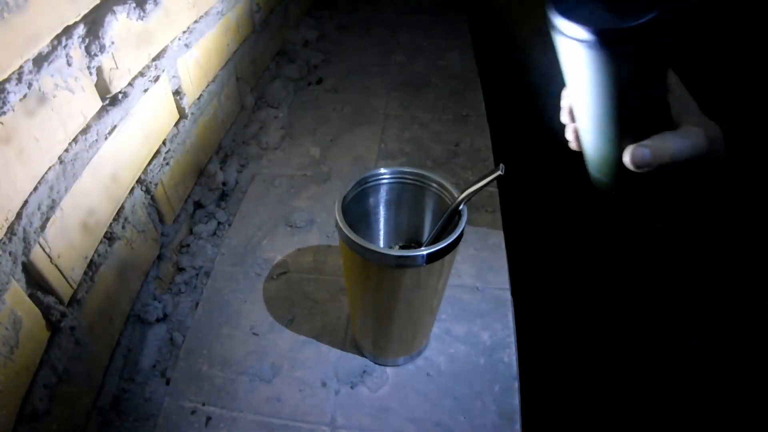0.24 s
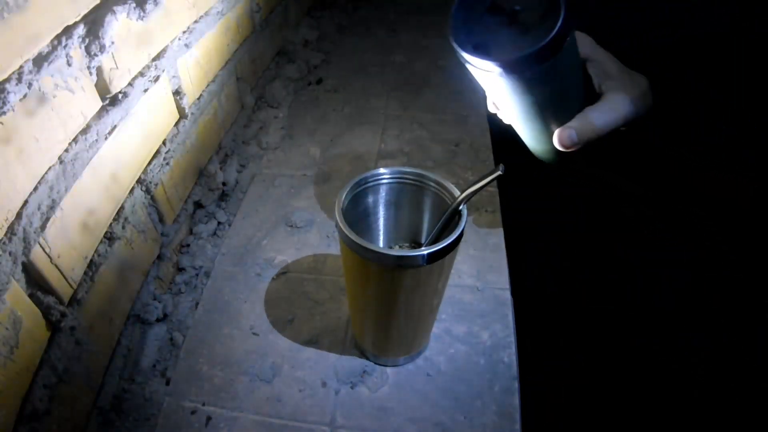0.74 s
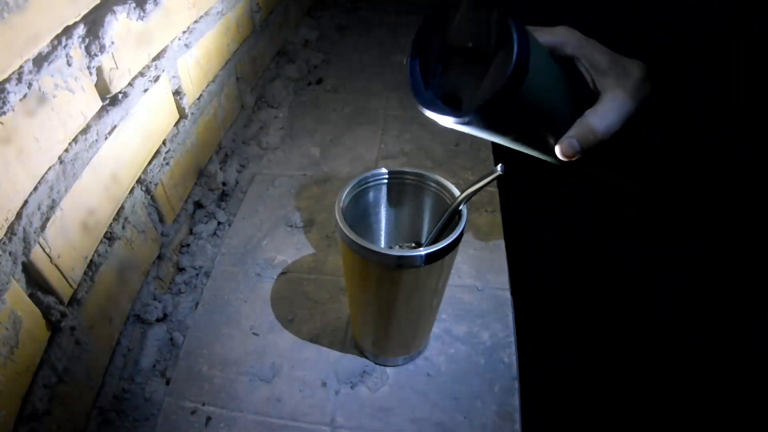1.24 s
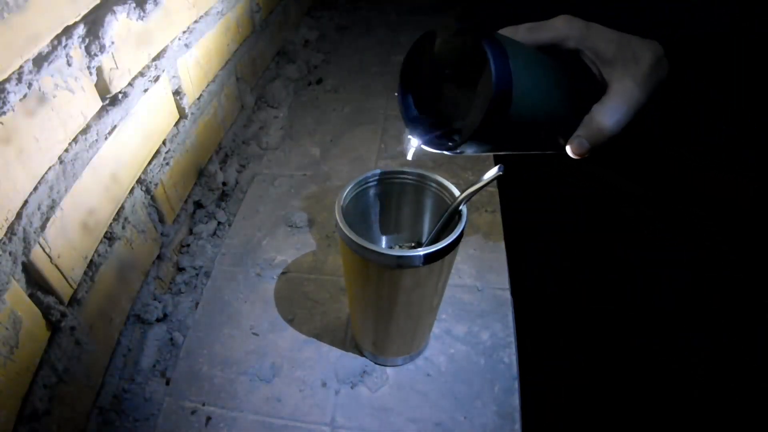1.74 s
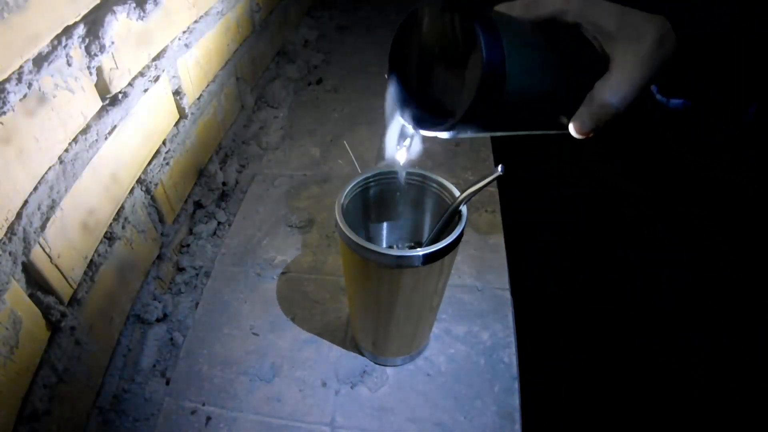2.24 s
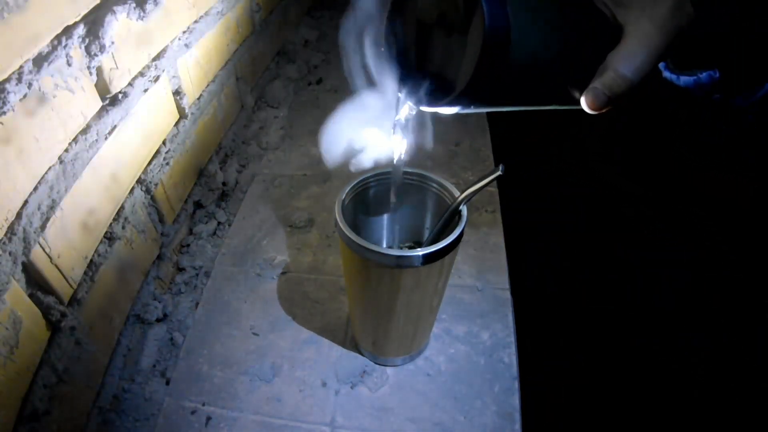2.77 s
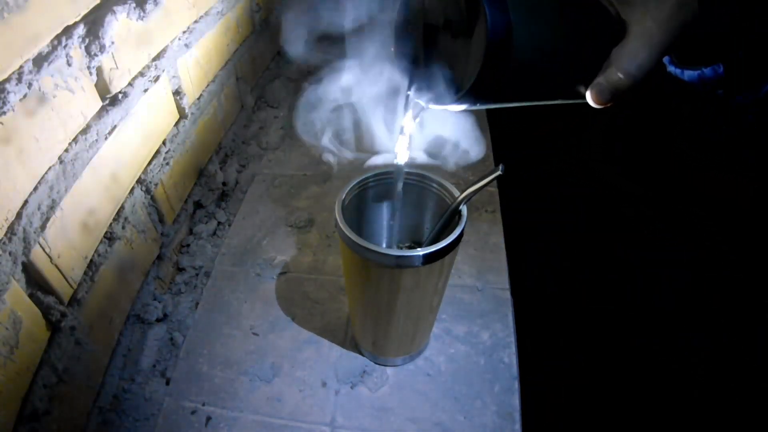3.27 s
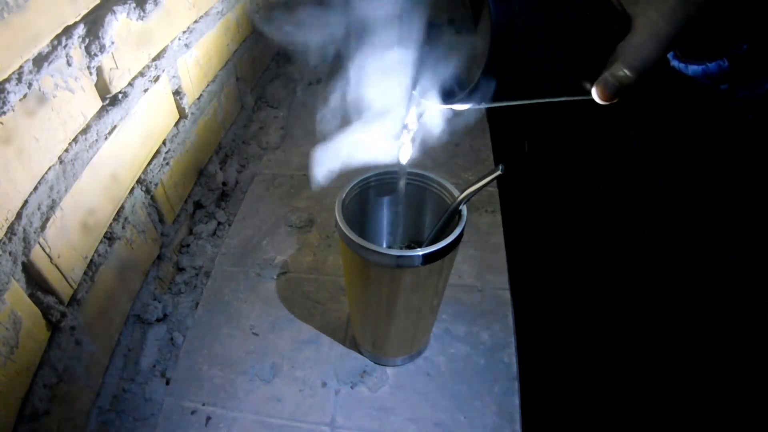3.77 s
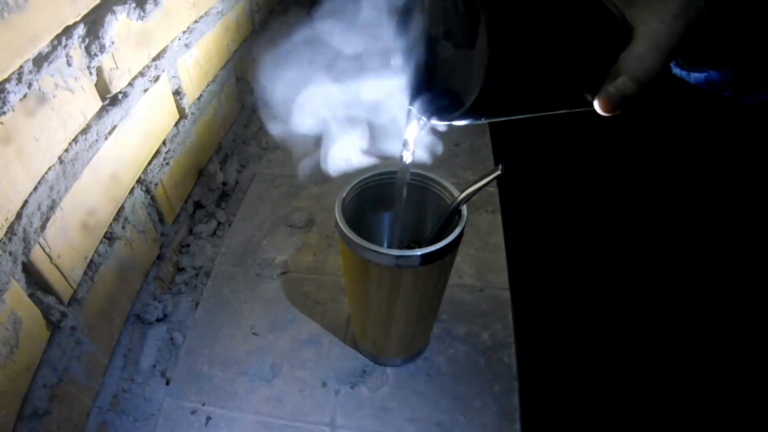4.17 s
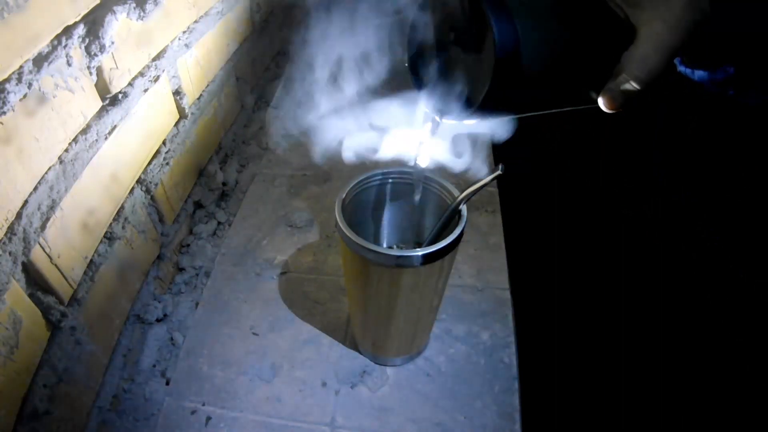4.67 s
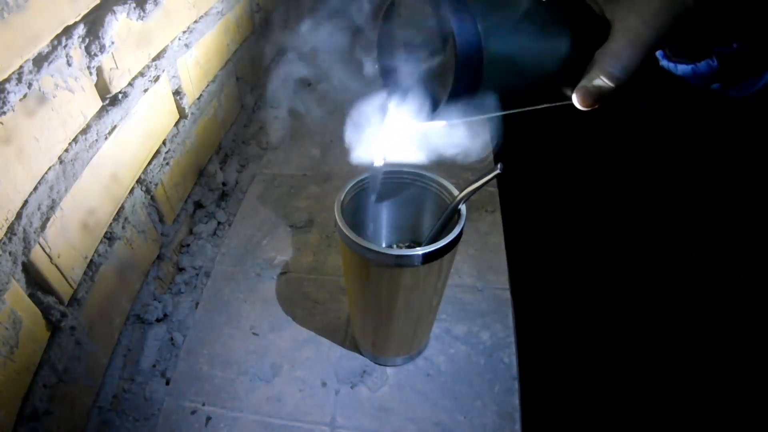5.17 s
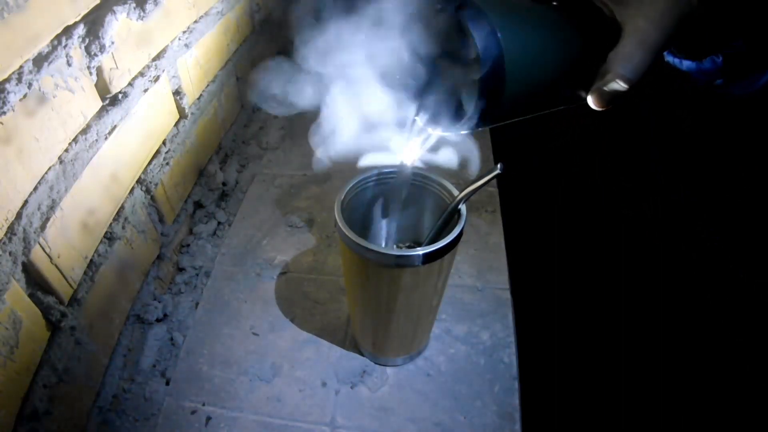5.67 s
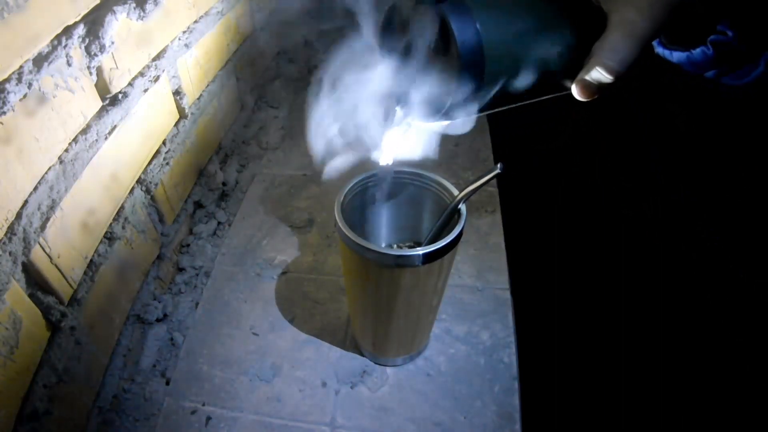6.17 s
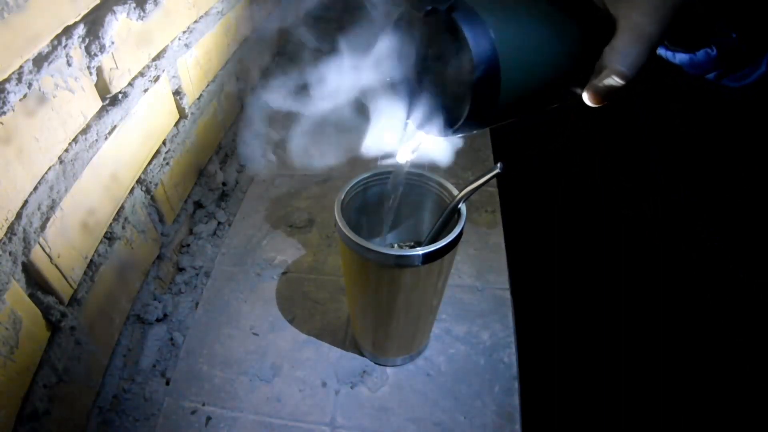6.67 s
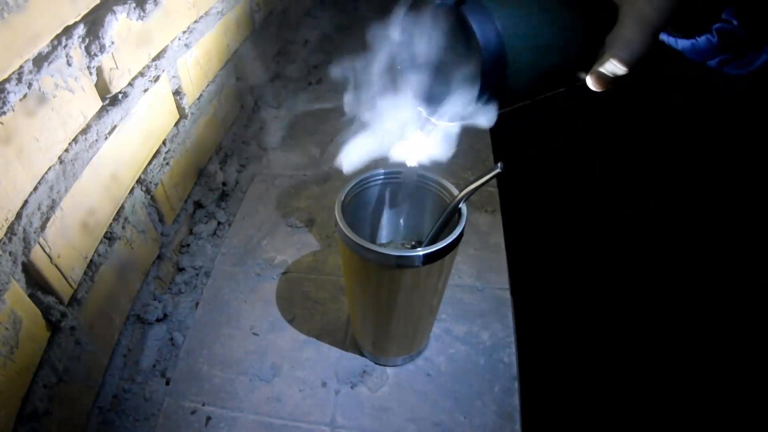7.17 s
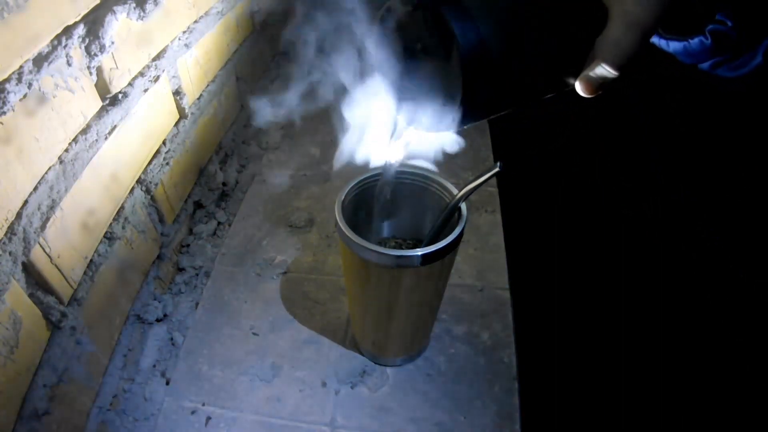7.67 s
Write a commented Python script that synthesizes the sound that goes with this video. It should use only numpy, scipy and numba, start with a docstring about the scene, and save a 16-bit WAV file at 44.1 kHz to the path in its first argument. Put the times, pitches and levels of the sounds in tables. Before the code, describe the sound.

Distant echoing knocks, then bubbly pouring into a resonant metal tumbler with a lull of drips midway, above a steady deep mechanical rumble.

```python
"""Far machinery rumbles, throbs and hums throughout: filtered noise, beating sines, broad air noise.
Early on a few distant knocks, noise bursts with low rings, die away in a large bare building.
Then hot water is poured from a flask into a tall metal cup: first drips and light spray, then a dense
run of plops, a lull of drips and a second run. Each slug swells a bubble and rings the air column and
wall of the cup; grains of spray ring its metal, small bubbles tick between, and the hall answers."""
import sys
import numpy as np
from scipy import signal
from scipy.fft import rfft, irfft
from scipy.io import wavfile
from scipy.ndimage import uniform_filter1d
from numba import njit

SR = 44100
rng = np.random.default_rng(int(sys.argv[2]) if len(sys.argv) > 2 else 0)


def wav_out(sig):
    """Save sig, one row per channel (or a flat mono array), as 16-bit PCM at SR to the path in sys.argv[1]."""
    wavfile.write(sys.argv[1], SR, np.round(np.clip(np.atleast_2d(sig).T, -1, 1) * 32767).astype(np.int16))


N = 349272
T = np.arange(N) / SR
BANDS_HZ = 25 * 2 ** np.arange(0, 9.6, .5)  # half-octave centres


def undb(db):
    """Turn dB into gain."""
    return 10 ** (np.asarray(db) / 20)


def level(x, db):
    """Scale a signal to an rms level in dB."""
    return x * undb(db) / np.sqrt(np.mean(x ** 2))


def on_log(hz, table):
    """Read (Hz, value) points on a log-frequency axis."""
    points_hz, values = np.array(table).T
    return np.interp(np.log(np.maximum(hz, 1)), np.log(points_hz), values)


def lift(hz, modes):
    """Gain of resonant humps over a flat response."""
    return undb(sum(db / (1 + (2 * (hz - f) / w) ** 2) for f, w, db in modes))


def walk(rate):
    """Random levels held 1 / rate s and slewed twice; spread near 1."""
    k = int(SR / rate)
    steps = np.repeat(rng.standard_normal(N // k + 1), k)
    return 1.3 * uniform_filter1d(uniform_filter1d(steps, k), k)[:N]


def noise_bands(gain_at):
    """One noise of the given spectrum, cut into overlapping half-octave bands that sum to the whole."""
    hz = np.fft.rfftfreq(N, 1 / SR)
    whole = rfft(rng.standard_normal(N)) * gain_at(hz)
    whole /= np.sqrt(2 * np.sum(np.abs(whole) ** 2)) / N  # rms of 1
    place = 2 * np.log2(np.maximum(hz, 1) / BANDS_HZ[0])
    return [irfft(whole * np.clip(1 - np.abs(place - k), 0, 1), N) for k in range(len(BANDS_HZ))]


@njit
def ring(x, hz, width):
    """A resonance whose centre and width move; an impulse of 1 rings with peak near 1."""
    y, z = np.empty(len(x)), 0j
    for i in range(len(x)):
        z = z * np.exp((2j * hz[i] - width[i]) * np.pi / SR) + x[i]
        y[i] = z.imag
    return y


def still(x, hz, width):
    """A resonance whose centre and width stay put."""
    return ring(x, np.full(N, 1. * hz), np.full(N, 1. * width))


def add(out, s, x):
    """Mix a short sound into a layer at s seconds."""
    i = max(int(s * SR), 0)
    out[i:i + len(x)] += x[:N - i]


# Far machinery as wavering bands. Each row: centre in Hz, width of each of two filters in Hz, level in dB rms.
RUMBLE_BANDS = [(34.8, 12, -39), (65.8, 4.3, -42), (149.8, 5.7, -47.5), (111.8, 9.3, -43), (125.6, 18, -51),
                (167.8, 14.7, -42), (227.3, 3.1, -51.5), (260.6, 3.6, -52.5), (279.5, 7.1, -50)]


def rumble():
    """Noise through two equal resonances in a row wavers as a narrow band."""
    out = 0
    for hz, width, db in RUMBLE_BANDS:
        once = still(rng.standard_normal(N), hz, width)
        out = out + level(still(once, hz, width), db)
    return out


# Machines at nearly the same speed beat. Each row: second at which they swell together, drift in dB
# per second, and the tones, each with pitch in Hz and level in dB rms at that second.
BEATING_MACHINES = [(3.279, -0.4, [(35.38, -34.5), (33.4, -51), (28.2, -53)]),
                    (3.62, -0.13, [(67.73, -38.5), (68.77, -42), (64.77, -41.5), (66.27, -46.5),
                    (74.44, -41)]), (5.47, 0.75, [(146.9, -33.5), (148, -47), (147.7, -46), (140.8, -56)])]


def throbs():
    """Close sines line up at one moment and beat slowly around it."""
    out = np.zeros(N)
    for s, drift_db, tones in BEATING_MACHINES:
        t = T - s
        start = 2 * np.pi * rng.random()
        for hz, db in tones:
            out += np.sqrt(2) * undb(db + drift_db * t) * np.sin(2 * np.pi * hz * t + start)
    return out


# Steadier machine tones. Each row: central pitch in Hz, central level in dB rms.
HUM_TONES = [(100.06, -31), (111.13, -42), (116.67, -44), (166.7, -50.5), (171.21, -49.5), (173.28, -46),
             (200.13, -54.5), (224.18, -55), (300.2, -46)]


def hum():
    """Sines that waver a little in level and phase."""
    out = np.zeros(N)
    for hz, db in HUM_TONES:
        gain = np.sqrt(2) * undb(db + 2.26 * walk(4.5))
        out += gain * np.sin(2 * np.pi * hz * T + 0.49 * walk(2.354) + 2 * np.pi * rng.random())
    return out


# Tilt of the broad air noise. Each row: frequency in Hz, relative density in dB.
AIR_SPECTRUM = [(15, -42), (25, -21), (70, -12), (150, -7.5), (200, -13.5), (306, -24), (340, -28.5),
                (550, -31.5), (1000, -33.5), (1600, -41.5), (2300, -52), (3400, -56.5), (4500, -60),
                (5600, -64), (9000, -65), (15600, -67.5)]
# Bands that stand out of it. Each row: centre in Hz, width in Hz, lift in dB.
AIR_HUMPS = [(411, 99, 7), (626, 30, 10), (3740, 240, 5), (4070, 130, 10.5), (5050, 230, 11.5),
             (8000, 200, 5), (7600, 200, 4.5), (10800, 200, 1.5), (11600, 200, 6.5), (11500, 200, 2),
             (15450, 250, -8)]
AIR_DB = -34.5  # central level of the whole, rms


def air():
    """Broad noise swells slowly as a whole while each band flickers on its own."""
    out = np.zeros(N)
    swell = walk(0.89)
    for band in noise_bands(lambda f: undb(on_log(f, AIR_SPECTRUM)) * lift(f, AIR_HUMPS)):
        out += band * undb(AIR_DB + .5 * swell + 1.17 * walk(9))
    return out


def machinery():
    """Narrow rumble, slow throbs, steadier hum and broad air noise together."""
    return rumble() + throbs() + hum() + air()


# Decay of the hall. Each row: frequency in Hz, time to fall 60 dB in seconds.
HALL_DECAY = [(200, 1.77), (500, 0.98), (1500, 1.17), (4000, 0.98), (12000, 0.92)]
HALL_DB = -8  # energy of the echo response


def hall(dry):
    """Bare walls answer with diffuse noise, each band dying at its own rate."""
    t = T[:SR]
    tail = 0
    for hz, band in zip(BANDS_HZ, noise_bands(np.ones_like)):
        tail = tail + band[:SR] * undb(-60 * t / on_log(hz, HALL_DECAY))
    tail *= 1 - np.exp(-t / 0.00037)
    return signal.fftconvolve(dry, tail * undb(HALL_DB) / np.sqrt(np.sum(tail ** 2)))[:N]


# Distant blows. Each row: start in seconds, relative level in dB, brightness in dB per octave about
# 1 kHz, rise time constant in seconds.
KNOCK_TIMES = [(.005, -29, 2, 0.00014), (0.163, -20.5, 1, 0.0036), (0.289, -35, -1, 0.0014),
               (1.067, -41.5, 3, 0.0085)]
# Colour of a blow. Each row: frequency in Hz, relative density in dB.
KNOCK_SPECTRUM = [(110, -40), (180, -29), (261, 0.5), (314, -8), (438, -11.5), (527, -12.5), (791, -16),
                  (1040, -18.5), (1630, -20), (2030, -30.5), (3960, -42), (6290, -53), (15000, -59)]
# Resonances in that colour. Each row: centre in Hz, width in Hz, lift in dB.
KNOCK_HUMPS = [(252, 35, 4), (165, 29, 19), (307, 21, -6.5), (364, 30, 4), (429, 47, 4), (786, 12, 13),
               (1180, 66, 7.5), (1640, 56, 7.5), (2170, 520, 6), (2960, 390, -4), (3770, 450, 6.5),
               (5100, 1800, 6)]
# Low rings of the struck object itself. Each row: pitch in Hz, width in Hz, level against the knock in dB.
STRUCK_RINGS = [(245.4, 6, 1.5), (281, 10, -18)]
THUD_GAIN, THUD_S, THUD_TOP_HZ = 0.76, 0.018, 484  # the low body starts stronger and sinks fast
CRACK_GAIN, CRACK_S, CRACK_FROM_HZ = 0.47, 0.043, 4000  # the treble starts brighter too


def knock_echoes():
    """Far blows arrive almost wholly as echo: a quick rise, then the decay of the hall."""
    out = np.zeros(N)

    def colour(f):
        return undb(on_log(f, KNOCK_SPECTRUM)) * lift(f, KNOCK_HUMPS) * (f > 150)

    for hz, band in zip(BANDS_HZ, noise_bands(colour)):
        rough = undb(2.7 * walk(30.2))  # single echoes stand out of the tail
        for s, db, tilt_db, rise in KNOCK_TIMES:
            t = np.maximum(T - s, 0)
            thud = THUD_GAIN * np.exp(-t / THUD_S) / (1 + (hz / THUD_TOP_HZ) ** 4)
            bright = CRACK_GAIN * np.exp(-t / CRACK_S) / (1 + (CRACK_FROM_HZ / hz) ** 4)
            first = 1 + 0.37 * np.exp(-t / 0.0055) + thud + bright
            decay = undb(db + tilt_db * np.log2(hz / 1000) - 60 * t / on_log(hz, HALL_DECAY))
            out += band * decay * first * rough * (1 - np.exp(-t / rise))
    return out


def knock_rings():
    """The struck object sounds its low modes as decaying sines."""
    out = np.zeros(N)
    for s, db, tilt_db, rise in KNOCK_TIMES:
        t = np.maximum(T - s, 0)
        for hz, width, ring_db in STRUCK_RINGS:
            gain = undb(db + ring_db + tilt_db * np.log2(hz / 1000))
            shape = np.exp(-np.pi * width * t) * (1 - np.exp(-t / rise))
            out += gain * shape * np.sin(2 * np.pi * hz * t)
    return out


def knocks():
    """Each blow is diffuse echo with its low rings coming through."""
    return knock_echoes() + knock_rings()


# Spurts of spray. Each row: peak in seconds, relative level in dB, finest drops against that level in dB.
SPRAY_SPURTS = [(1.97, -62, -18), (2.13, -64, -13), (2.29, -56.5, -5), (2.48, -58, -7), (2.55, -59, -9),
                (3.17, -59, -12), (3.29, -67, -9), (3.42, -54, -17), (3.53, -52, -16), (3.6, -66, -16),
                (4.41, -55.5, -4), (4.8, -57, -14), (5.44, -66, -11), (5.59, -58, -13), (5.99, -63, -6),
                (6.88, -59, -8), (6.96, -64, -6), (7.53, -57, 5), (7.68, -56, -8), (7.73, -54, -19),
                (7.92, -55, -11)]
SPURT_RISE_S, SPURT_FALL_S = 0.026, 0.0088  # time constants


def spurting(db, spurt_db):
    """A level in dB with the power of the spurts added: each swells and dies quickly."""
    for (s, *_), top_db in zip(SPRAY_SPURTS, spurt_db):
        shape = np.exp(-np.abs(T - s) / np.where(T < s, SPURT_RISE_S, SPURT_FALL_S))
        db = 20 * np.log10(np.hypot(undb(db), undb(top_db) * shape))
    return db


# The stream. Each row: time in seconds, relative patter level in dB, relative spray level in dB, finest
# drops against the spray in dB.
STREAM = [(1.9, -62, -75, -8), (2.05, -56, -70, -1), (2.32, -55, -76, 2), (2.6, -46, -73, 2),
          (2.74, -47, -64, 1), (2.87, -48, -63, -4), (3.1, -47, -65, -5), (3.26, -44, -80, -1),
          (3.63, -49, -73.5, 1), (3.83, -48, -64.5, -3), (4.1, -42, -69, -2), (4.45, -49.5, -66.5, -7),
          (4.8, -57, -68, -6), (5.29, -54, -68, -5), (6.04, -51.5, -69.5, 0), (6.49, -45.5, -61, -16),
          (6.61, -42.5, -62.5, -10), (7.05, -44, -67, -6), (7.18, -44, -63, -8), (7.48, -52, -66, -11),
          (7.92, -52, -60, -19)]
GUSTS_PER_S, GUST_DB = 20, 4  # the spray comes and goes by chance


def stream_levels():
    """Follow the stream: patter and gusty, spurting spray in dB, and the finest drops against the spray."""
    s, *columns = np.transpose(STREAM)
    patter_db, spray_db, finest_db = (np.interp(T, s, c) for c in columns)
    spray_db += GUST_DB * walk(GUSTS_PER_S)
    _, top_db, share_db = np.transpose(SPRAY_SPURTS)
    finest_db = spurting(spray_db + finest_db, top_db + share_db)
    spray_db = spurting(spray_db, top_db)
    return patter_db, spray_db, finest_db - spray_db


def scatter(count, level_db, spread_db, most_db):
    """Chance moments along the pour, sizes following its level; returns times, gains and a spare draw."""
    when, size, spare = rng.random((count, 3)).T
    s = STREAM[0][0] + (STREAM[-1][0] - STREAM[0][0]) * when
    size_db = np.minimum(-spread_db * np.log(size), most_db)
    return s, undb(np.interp(s, T, level_db) + size_db), spare


def bubble(hz, cycles, glide, count=900):
    """A trapped bubble swells over about a cycle, rings briefly and, with glide, rises in pitch."""
    c = np.arange(count) / SR * hz
    return (1 - np.exp(-(c / 1.45) ** 2)) * np.exp(-c / cycles) * np.sin(2 * np.pi * c * (1 + glide * c))


def slug(hz, count):
    """The push of a slug of water: a smooth swing, so that little spreads beyond the ring it drives."""
    return np.hanning(count) * np.sin(2 * np.pi * hz * T[:count]) * 4 / count


def grit_fade():
    """Envelope of a splash: a very quick rise and a short fall."""
    t = T[:160]
    return np.exp(-t / 0.0019) * (1 - np.exp(-t / 0.00046))


# Small bubbles. Each row: start in seconds, relative level in dB, central pitch in Hz.
SMALL_BUBBLES = [(1.9532, -49, 4150), (2.1378, -51, 5700), (2.2795, -52, 4000), (2.753, -50, 8960.0),
                 (2.8033, -51, 9900), (2.8175, -57, 5400), (2.8924, -51, 5410.0), (2.903, -47, 9940.0),
                 (3.0347, -42.5, 9400), (3.052, -50, 5340), (3.0648, -44, 9000), (3.1654, -46, 4100),
                 (3.4434, -51, 3950), (3.515, -46, 3900), (3.5931, -50, 4070), (3.7599, -49, 5370),
                 (3.7954, -39, 9300), (3.8161, -52, 9900), (3.8315, -40, 9250), (3.9095, -46, 10030.0),
                 (4.1347, -47, 5360), (4.4052, -50, 5460.0), (4.811, -49, 4000), (5.984, -49, 4000),
                 (6.0141, -55, 4060), (6.267, -50, 4300), (6.3845, -48, 5440), (6.7287, -53, 5400),
                 (6.869, -46, 5600), (6.9626, -43, 5700), (7.069, -48.0, 5770), (7.4536, -52, 5170),
                 (7.4793, -50, 4300), (7.742, -47, 3250), (7.827, -47, 3980)]
TICK_SPREAD, TICK_GAP_S = 0.03, 0.0061  # a small bubble bursts into three, apart in pitch and time


def ticks(bubbles, crack):
    """A small bubble clicks and bursts into three long-ringing ones, each weaker than the last."""
    for (s, db, hz), detune in zip(SMALL_BUBBLES, rng.standard_normal((len(SMALL_BUBBLES), 3))):
        for k, d in enumerate(detune):
            tone = bubble(hz * (1 + TICK_SPREAD * d), cycles=11.7, glide=0.00044, count=500)
            add(bubbles, s + k * TICK_GAP_S, undb(db - 4.4 * k) * tone)
        add(crack, s, undb(db - 17) * np.ones(1))


# Thin drips while the stream is weak. Each row: start in seconds, relative level in dB, centre in Hz.
THIN_DRIPS = [(2.08, -37.5, 1950), (2.2164, -37, 1830), (2.237, -36.5, 1940), (2.471, -41.5, 2730),
              (4.79, -66, 4050), (4.847, -42, 1920), (5.035, -39, 2190), (5.1628, -46, 2190),
              (5.3643, -40.5, 1880), (5.539, -51, 1800), (5.8688, -40, 2130), (6.0284, -46, 1820),
              (6.1397, -46, 1970), (6.289, -40, 1860), (6.4084, -43, 2450)]
# Push on the air column at 2 kHz; the slope adds with rising centre frequency.
DRIP_PUSH_DB, DRIP_PUSH_DB_PER_OCTAVE = 7.5, 1


def drips(bubbles, push, crack):
    """A drip is a gritty burst smeared by a very short bubble, with a push on the air column."""
    fading, on_air = grit_fade(), slug(1156, count=66)
    for (s, db, hz), grit in zip(THIN_DRIPS, rng.standard_normal((len(THIN_DRIPS), 160))):
        burst = grit * fading
        tone = np.convolve(burst, bubble(hz, cycles=0.61, glide=0, count=40)) / 3
        add(bubbles, s, undb(db + 17.0) * tone)
        add(push, s, undb(db + DRIP_PUSH_DB + DRIP_PUSH_DB_PER_OCTAVE * np.log2(hz / 2000)) * on_air)
        add(crack, s, undb(db - 32.5) * burst)


def patter(bubbles, push, crack, patter_db):
    """Dense small slugs at chance moments: each a bubble, a push on the air column and a faint click."""
    on_air = slug(950, count=66)
    grains = scatter(count=900, level_db=patter_db + 1.5, spread_db=6.0, most_db=13.5)
    for s, gain, pitch in zip(*grains):
        tone = bubble(780 * 3.2 ** (pitch ** 1.5), cycles=1.75, glide=0.0095, count=500)
        add(push, s, gain * undb(-3.0) * on_air)
        add(bubbles, s, gain * undb(-1.0) * tone)
        add(crack, s, gain * undb(-30.5) * np.ones(1))


# Treble rings of the cup and its metal straw. Each row: pitch in Hz, width in Hz, relative level in dB.
METAL_RINGS = [(2390, 270, 5.5), (2700, 310, 8.5), (3854, 200, 2), (4440, 200, 0), (5360, 380, 7),
               (6440, 330, -1), (7470, 260, -7), (9170, 340, -3.5), (10030, 89, -10.5), (11330, 370, -5.5),
               (13800, 500, -21), (15700, 300, -26)]
# Relative levels in dB of the air-column multiples 3, 5, .. 15.
OVERTONE_LEVELS = [-8.5, -4.5, -8.5, -7.5, -11, -11, -14]
OVERTONE_HZ, OVERTONE_WIDTH_HZ = 972, 105  # base of the odd multiples; width of the third
OVERTONE_WIDENING = 0.083  # share of that width gained from one multiple to the next
COARSE_TOP_HZ = 3600  # coarse splash drives the rings below this, fine splash those above
PATCHY_DB, PATCHES_PER_S = 2.5, 11  # each ring gets its spray in patches


def treble_rings(crack, coarse, fine, spray_db, finest_db):
    """Spray and splashes ring the metal and the odd multiples of a tube closed at one end."""
    s, gain, _ = scatter(count=2500, level_db=spray_db - 10.5, spread_db=2.5, most_db=13)
    moments = (s * SR).astype(int)
    overtones = []
    for k, db in enumerate(OVERTONE_LEVELS):
        width = OVERTONE_WIDTH_HZ * (1 + OVERTONE_WIDENING * k)
        overtones.append(((3 + 2 * k) * OVERTONE_HZ, width, db))
    treble = np.zeros(N)
    for modes, crack_db, drops_db in ((METAL_RINGS, -6, 0), (overtones, 2, -10)):
        for hz, width, db in modes:
            # each drop lands elsewhere and so strikes the rings in its own proportions
            spray = np.bincount(moments, gain * rng.standard_normal(len(s)), N + 1)[:N]
            finest = (finest_db + 11.5) * (hz > 8000)  # the highest rings follow the finest drops
            spray *= undb(finest + PATCHY_DB * walk(PATCHES_PER_S))
            splash = crack + (coarse if hz < COARSE_TOP_HZ else fine)
            treble += undb(db) * still(undb(drops_db) * spray + undb(crack_db) * splash, hz, width)
    return treble


# Air column of the cup. Each row: time in seconds, width of the lowest mode in Hz, central pitch of the
# bubbles trapped by plops in Hz.
AIR_COLUMN = [(1.9, 192, 1420), (4.6, 179, 1380), (6.2, 143, 1407), (7.92, 102, 1333)]
# Plops. Each row: splash in seconds, then relative levels in dB of the push on the air column, trapped
# bubble, wall ring, coarse splash and fine splash, then central pitch of the air column in Hz.
PLOP_EVENTS = [(2.2666, -23, -15.5, -48, -73, -68, 1080), (2.2799, -19.5, -13, -35, -74, -71, 1080),
               (2.5353, -23.5, -21.0, -35, -61.0, -68, 1055), (2.633, -28.0, -24, -47, -60, -75.0, 1040),
               (2.7215, -17.5, -15, -38, -67, -60, 1030), (2.7543, -21, -19, -36, -74, -78, 1050),
               (2.786, -20.5, -17, -42.0, -74, -68, 1040), (2.8035, -34, -21, -59, -70, -68, 1050),
               (2.8163, -25, -19.5, -43.0, -68.0, -71, 1045), (2.83, -22, -40, -46, -60, -73, 990),
               (2.859, -23, -17, -56.0, -66.0, -77, 1040), (2.8787, -18, -28.5, -46, -67, -72, 1030),
               (2.8919, -14.5, -12, -35.5, -54.5, -63, 1045), (2.9023, -24, -21.5, -56.0, -66.0, -69, 1035),
               (2.9323, -12, -11.5, -35, -67.5, -62, 1040), (2.953, -30.5, -30, -40, -76.0, -73.0, 1050),
               (2.978, -16.5, -17, -56.5, -67, -68, 1020), (3.002, -34, -23, -45, -66, -73.5, 1050),
               (3.042, -27.5, -33, -54.0, -69.0, -65, 1025), (3.0526, -21, -16, -47, -68, -65, 1040),
               (3.0819, -18, -14, -38, -68.5, -67, 1060), (3.1185, -16, -15.5, -36, -67.0, -66.5, 1050),
               (3.144, -34, -26, -48, -72, -79, 1035), (3.1593, -24.5, -21, -42, -66, -66, 1055),
               (3.1848, -19, -22.5, -35, -78.5, -72, 1060), (3.2396, -33, -41, -48.5, -72, -81, 1050),
               (3.2594, -25.5, -23.5, -47.0, -75, -69, 1020), (3.272, -35, -21.5, -50, -81.0, -71.5, 1030),
               (3.2889, -14, -15.5, -30, -67.5, -65.5, 1010), (3.308, -33.5, -24, -56.5, -72, -78.0, 1050),
               (3.3292, -33, -29, -41, -85.5, -74, 1040), (3.3623, -28, -26.5, -45, -73.0, -78.0, 1070),
               (3.368, -27, -22.5, -45, -77.5, -80.0, 1090),
               (3.4407, -17.0, -15, -41.5, -59.5, -67.0, 1050),
               (3.472, -20.0, -20.5, -41.5, -69, -67, 1030), (3.523, -19, -17.5, -52.0, -57.5, -65, 980),
               (3.5418, -26, -28.5, -54.5, -71, -77.5, 1035), (3.5579, -13, -30, -33, -65.5, -64, 1035),
               (3.572, -11, -18, -24, -59, -59, 1030), (3.608, -14.5, -17, -39, -74.0, -66, 1010),
               (3.6515, -28, -38, -53, -65, -74.5, 995), (3.6733, -25, -21.5, -33, -67, -71, 1015),
               (3.6857, -15, -27, -38.5, -64, -66, 1040), (3.7353, -25.5, -34, -55.0, -75, -66, 1045),
               (3.7986, -31, -36.5, -38, -71.5, -68.5, 1000), (3.8147, -20, -16, -41, -69.5, -69, 1050),
               (3.8382, -18.5, -22.5, -56.5, -57, -62, 1010), (3.969, -20, -19, -41.5, -71, -68, 1030),
               (4.004, -18, -15, -44.0, -66, -67, 1040), (4.0625, -27, -24, -37, -76.0, -67, 970),
               (4.0828, -25.5, -25.5, -38, -74.0, -77.0, 1020), (4.1025, -29, -24, -49.5, -83.5, -79, 990),
               (4.111, -31, -23, -56.0, -75.5, -77.5, 1055), (4.1338, -20.5, -22, -40, -70.5, -69, 990),
               (4.1527, -22, -25, -41, -65, -71, 1105), (4.164, -19.5, -19.5, -34, -59, -66, 1010),
               (4.184, -26, -28.0, -51, -67, -75.5, 1030), (4.196, -28, -28, -56.0, -72.0, -76.0, 1015),
               (4.2945, -25.5, -20, -56, -69, -78, 1015), (4.384, -30, -22, -57.5, -69, -72.5, 1005),
               (4.417, -22.0, -17.5, -42.5, -68.0, -68.0, 1070), (4.443, -18, -18, -46.5, -66, -69, 1045),
               (4.4662, -14.5, -15, -42, -56.5, -63, 1080), (4.4877, -23.5, -19.5, -48, -68.0, -75, 1050),
               (4.5, -16.5, -15.5, -35, -71, -68.0, 1015), (4.522, -17.5, -19, -39.0, -75, -68.0, 1050),
               (4.552, -25, -22.5, -50.0, -82.5, -79, 1030), (4.9117, -36, -37, -58.0, -84, -72, 1005),
               (5.294, -34, -32, -60.5, -76.5, -84, 1000), (5.467, -31, -37.5, -52.5, -77.5, -84.5, 990),
               (5.853, -38, -37, -46.5, -73.5, -86.0, 965), (5.984, -31, -41, -56.5, -78, -74, 970),
               (6.0147, -30.5, -27.5, -54, -74, -68, 960), (6.16, -23, -19, -43, -63, -74, 970),
               (6.192, -27.5, -27, -54.0, -72.0, -75, 940), (6.201, -33, -35.5, -49.5, -68.0, -78, 950),
               (6.2432, -30.5, -30, -43, -65, -79, 950), (6.2677, -27.0, -29, -59.5, -61.5, -76, 940),
               (6.429, -28.0, -28.0, -50.0, -72.5, -69, 960),
               (6.4523, -23, -36.0, -46.5, -76.0, -73.0, 940),
               (6.5026, -28.5, -40.5, -58.5, -79, -72.5, 945), (6.516, -26, -33, -49.5, -59, -77.0, 985),
               (6.5454, -17.5, -21.5, -53, -73.5, -66, 1060), (6.565, -26.0, -21.5, -44, -73.5, -73.5, 970),
               (6.625, -25, -39.5, -59.0, -67, -78, 940), (6.6391, -15, -22, -50, -63, -66, 980),
               (6.6916, -17.5, -19, -51, -66.5, -67.0, 970), (6.727, -24, -20.5, -58.5, -72, -63, 1040),
               (6.74, -17, -20, -55, -64, -67.0, 940), (6.7662, -22.0, -27, -59.5, -70.5, -74, 990),
               (6.7775, -21.5, -30, -59.0, -72.5, -78, 1000), (6.7988, -27.5, -32, -60.0, -77.0, -79, 940),
               (6.872, -22.5, -29, -48, -84.0, -63, 990), (6.8883, -23.5, -27, -59.0, -69.5, -75.0, 975),
               (6.9627, -22, -26, -44.0, -78.5, -61, 960), (6.995, -32.5, -34, -58.0, -84.5, -80.0, 975),
               (7.0143, -12.5, -28, -43, -60, -61, 980), (7.052, -18, -31.0, -46, -72, -63, 940),
               (7.0742, -14, -22, -48, -67.5, -60.5, 965), (7.085, -24, -35.5, -49.0, -75.0, -71, 995),
               (7.1112, -25, -33.5, -44.0, -68, -76.5, 985), (7.1166, -18, -33.5, -45.0, -59, -66, 940),
               (7.1447, -18, -19.5, -42.5, -59, -70.0, 980), (7.153, -15, -20.5, -33, -66, -63, 1010),
               (7.157, -16.5, -15.0, -47, -64, -68, 960), (7.186, -30, -28, -45.5, -79.5, -78.0, 1005),
               (7.1997, -18.5, -29.5, -41.0, -66, -67.0, 980), (7.2125, -16, -31, -37, -66, -68.5, 955),
               (7.2674, -13, -19, -41, -68, -61, 960), (7.278, -23, -34, -55.5, -71, -71.5, 950),
               (7.2996, -16.5, -20, -48.5, -61, -62, 1020), (7.3373, -22.5, -39.0, -49, -84, -74.0, 930),
               (7.357, -34, -27, -56.5, -65, -75.5, 1005), (7.4518, -25, -34, -56.0, -61, -68.0, 975),
               (7.4773, -19.5, -27, -43.5, -69, -63, 970), (7.5065, -10, -18, -34.0, -57, -58.5, 1005),
               (7.523, -19.5, -31.5, -43, -64, -60, 980), (7.5327, -16.0, -29.0, -36, -65, -64, 970),
               (7.601, -33, -27.5, -41, -74.5, -83.5, 975), (7.627, -28.5, -40.5, -54.0, -82, -82.0, 990),
               (7.6459, -27.5, -37.5, -48.0, -84.0, -81.0, 1000), (7.68, -17, -23, -44, -71, -67.0, 1060),
               (7.6894, -10.5, -11, -43, -55, -58.5, 1010), (7.7152, -30, -38.5, -57.5, -73.0, -72.0, 995),
               (7.74, -22, -40.5, -57, -67.5, -70.0, 980), (7.7568, -23, -28, -45, -74.5, -74.0, 980),
               (7.7747, -25.5, -29, -59.0, -79.0, -78, 1010), (7.7992, -24.5, -30.5, -44, -81, -71, 1030),
               (7.817, -26, -32.5, -58.5, -71.0, -70, 1005), (7.8363, -20.0, -25, -46, -75.0, -69, 1020),
               (7.8742, -22, -28.5, -59.0, -75.0, -70, 970), (7.8988, -21, -30, -59.5, -69, -64, 1005)]
COLUMN_WOBBLE = 0.019  # the surface never rests, so the air column wanders in pitch
WALL_HZ, WALL_WIDTH_HZ = 613, 44


def plops(bubbles, push, coarse, fine, wall):
    """Each slug traps a bubble, pushes the air column, strikes the wall and splashes."""
    s, _, bubble_hz = np.transpose(AIR_COLUMN)
    on_air, on_wall, fading = slug(1156, count=66), slug(WALL_HZ, count=110), grit_fade()
    draws = rng.standard_normal((len(PLOP_EVENTS), 161))
    for (at, db, bubble_db, wall_db, coarse_db, fine_db, _), draw in zip(PLOP_EVENTS, draws):
        hz = np.interp(at, s, bubble_hz) * (1 + .04 * draw[0])
        burst = draw[1:] * fading
        add(push, at - .0006, undb(db) * on_air)  # the air is pushed just before the splash breaks
        add(bubbles, at - .0006, undb(bubble_db) * bubble(hz, cycles=1.78, glide=0.0029))
        add(coarse, at, undb(coarse_db) * burst)
        add(fine, at, undb(fine_db) * burst)
        add(wall, at, undb(wall_db) * on_wall)


def air_column(push):
    """The lowest mode of the air in the cup; the heaving water retunes it at each plop."""
    s, widths, _ = np.transpose(AIR_COLUMN)
    plop_s, *_, pitch_hz = np.transpose(PLOP_EVENTS)
    latest = np.maximum(np.searchsorted(plop_s - .002, T) - 1, 0)
    hz = pitch_hz[latest] * (1 + COLUMN_WOBBLE * walk(45))
    return ring(push, hz, np.interp(T, s, widths))


def pour():
    """Plops, patter, drips, ticks and spray, sounding through the air, wall and metal of the cup."""
    patter_db, spray_db, finest_db = stream_levels()
    bubbles, push, crack, coarse, fine, wall = np.zeros((6, N))
    ticks(bubbles, crack)
    drips(bubbles, push, crack)
    patter(bubbles, push, crack, patter_db)
    plops(bubbles, push, coarse, fine, wall)
    treble = treble_rings(crack, coarse, fine, spray_db, finest_db)
    return bubbles + air_column(push) + treble + still(wall, WALL_HZ, WALL_WIDTH_HZ)


def scene():
    """Machinery and knocks behind the water and its echo."""
    water = pour()
    return (machinery() + knocks() + hall(water) + water)[None]


TOP_HZ = 15750


def record(dry):
    """The recorder rounds the loudest peaks and cuts the top."""
    rounded = dry / (1 + (np.abs(dry) / .33) ** 6) ** (1 / 6)
    return signal.sosfilt(signal.ellip(10, .2, 80, TOP_HZ, fs=SR, output="sos"), rounded)


dry = scene()
out = record(dry)
wav_out(out)
```